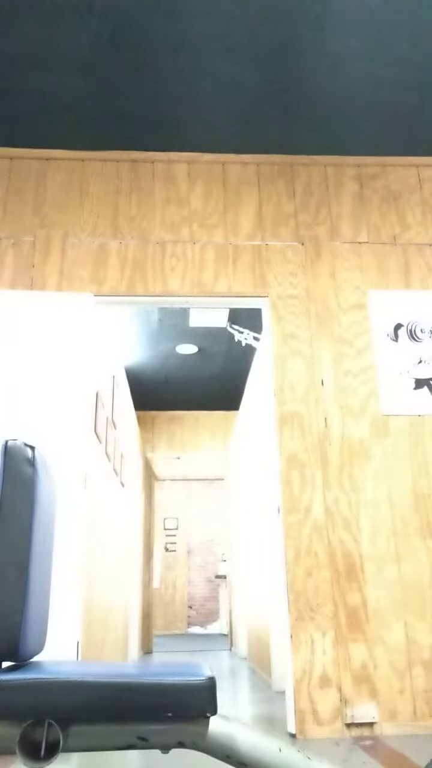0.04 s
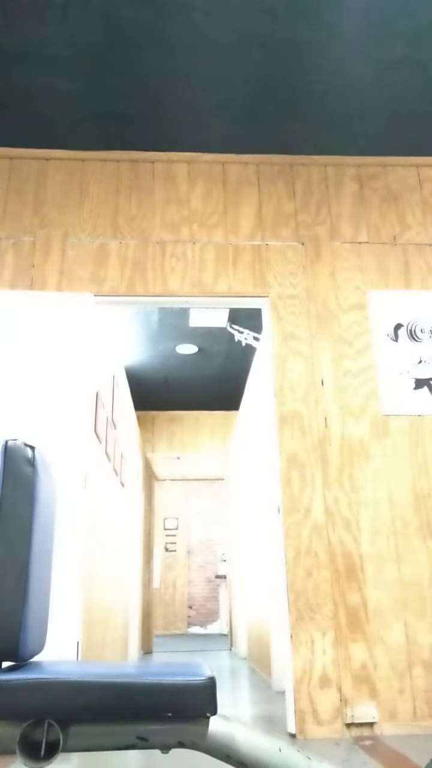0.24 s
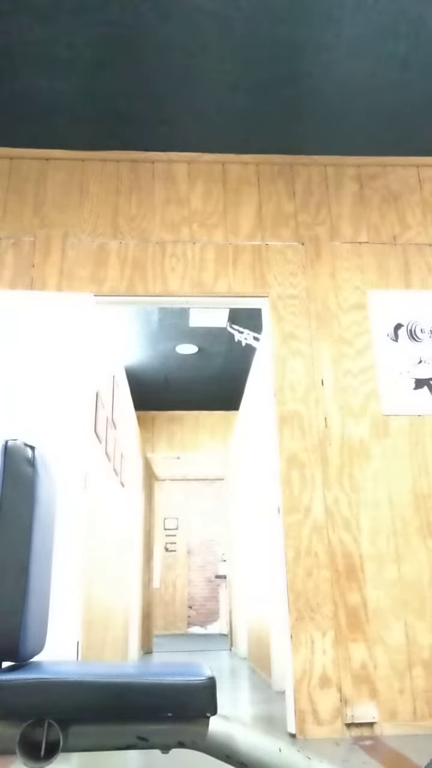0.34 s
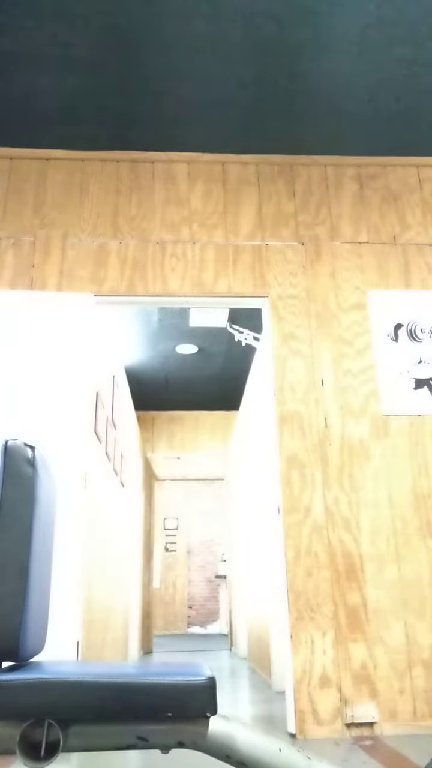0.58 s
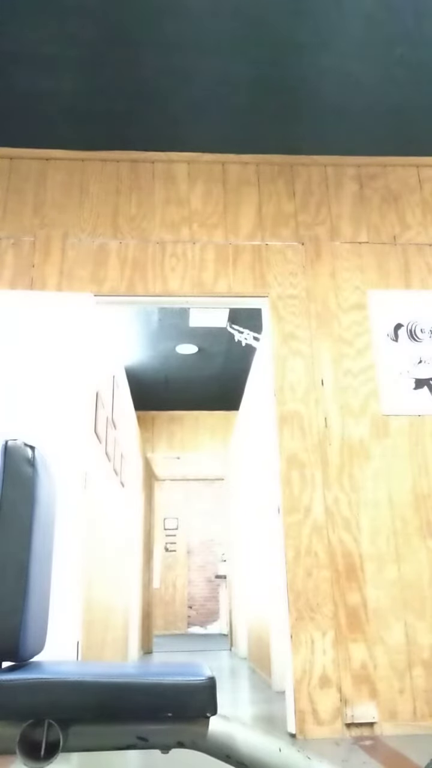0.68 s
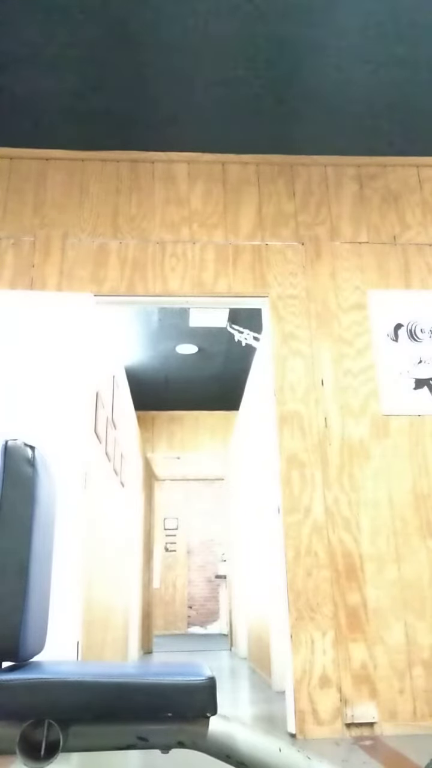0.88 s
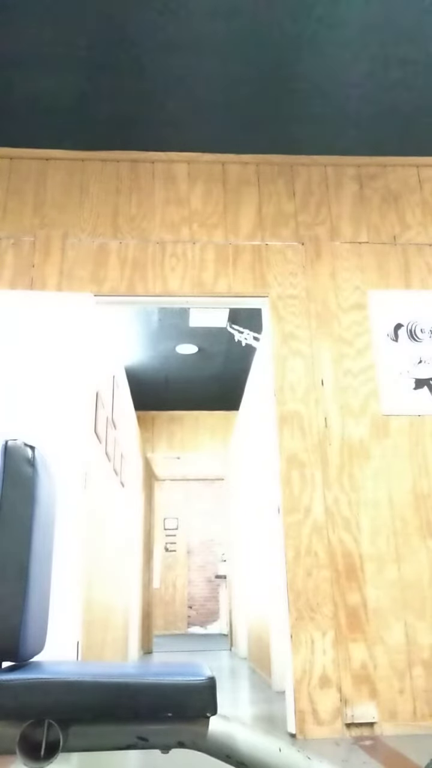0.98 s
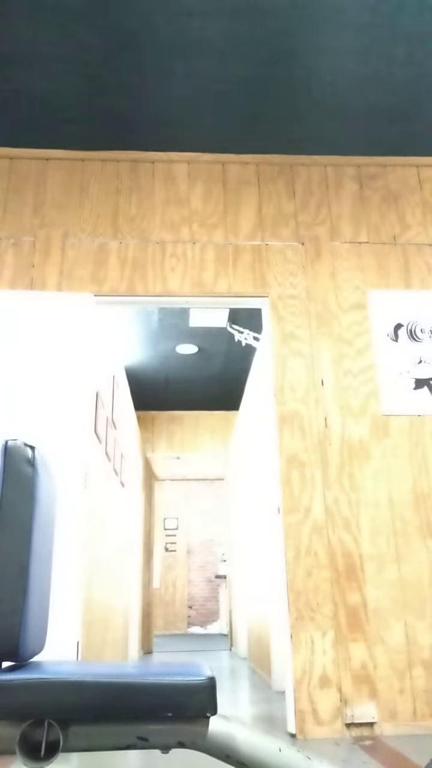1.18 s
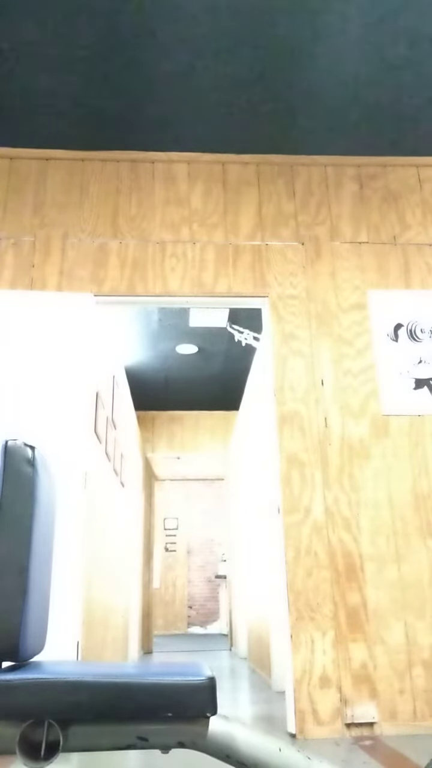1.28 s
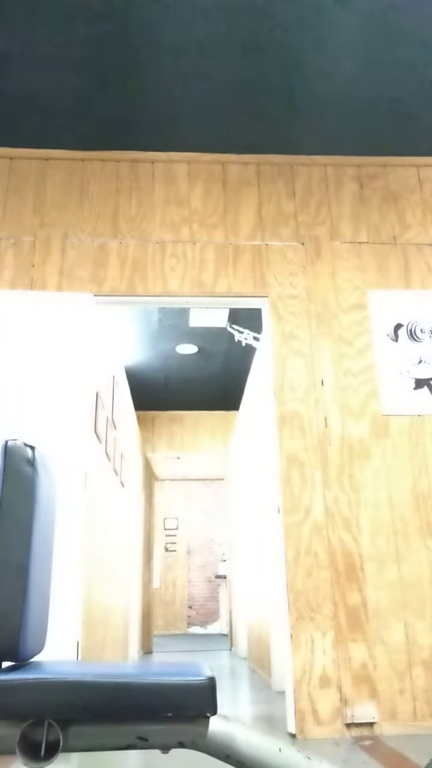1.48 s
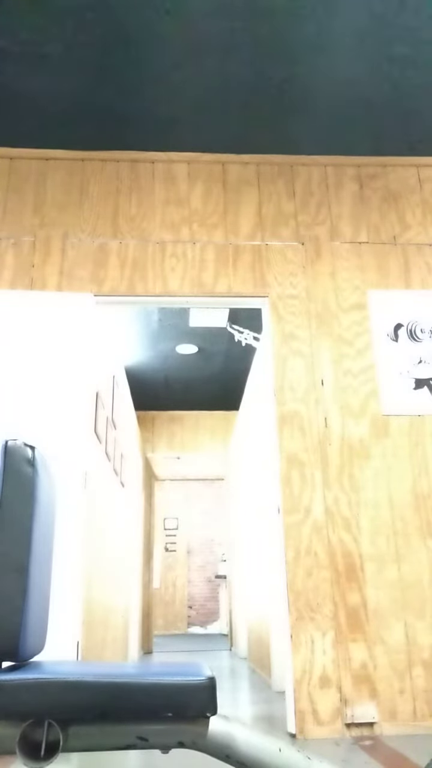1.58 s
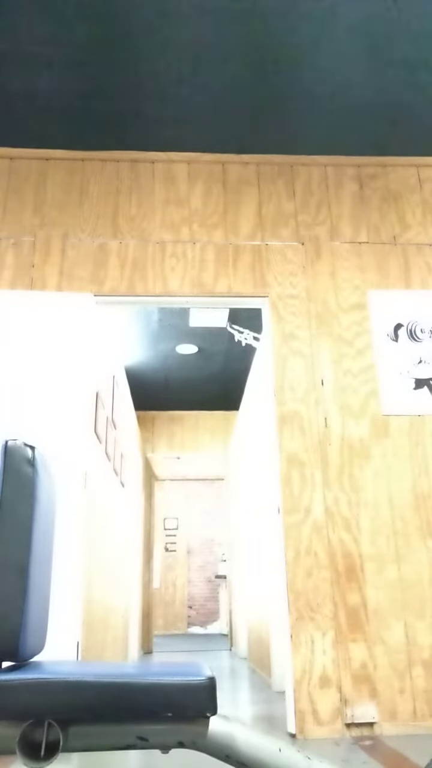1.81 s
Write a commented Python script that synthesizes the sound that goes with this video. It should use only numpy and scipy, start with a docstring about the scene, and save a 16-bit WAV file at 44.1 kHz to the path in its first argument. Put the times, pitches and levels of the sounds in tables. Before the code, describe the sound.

Gym weights land twice, a heavy thud then a bright iron clank, in an echoing room.

```python
"""Gym weights land twice, a few metres from the microphone in a hard-walled room.
First comes a heavy thud of the loaded frame on the floor, then a bright clank of iron plates.
Each landing is a quick run of contacts that rings the metal and fills the room.
Faint ventilation and a few soft rustles lie underneath."""
import sys
import numpy as np
from scipy import signal
from scipy.fft import rfft, irfft, next_fast_len
from scipy.io import wavfile

SR = 44100
rng = np.random.default_rng(int(sys.argv[2]) if len(sys.argv) > 2 else 0)


def put_to_file(sound):
    """Save the sound as 16-bit audio at rate SR, in the file named by the first command-line argument."""
    columns = np.atleast_2d(sound).T  # one column per channel
    safe = np.clip(columns, -1, 1)
    whole_steps = np.round(safe * 32767)
    wavfile.write(sys.argv[1], SR, whole_steps.astype(np.int16))


N = 81585
BUILD_S = 0.0034  # rise time of the ringing, in the metal and in the room


def undb(db):
    """Decibels to gain."""
    return 10 ** (np.asarray(db) / 20)


def along(points, hz):
    """Read (f/Hz, value) points on a log-frequency axis."""
    freqs, values = np.array(points, float).T
    return np.interp(np.log(np.maximum(hz, 1)), np.log(freqs), values)


def shape(x, gain):
    """Filter by a gain that is a function of frequency."""
    size = next_fast_len(len(x))
    hz = np.arange(size // 2 + 1) * SR / size
    return irfft(rfft(x, size) * gain(hz), size)[:len(x)]


def noise(colour):
    """Noise with rms 1 whose spectrum follows (f/Hz, level/dB) points."""
    x = shape(rng.standard_normal(N), lambda f: undb(along(colour, f)))
    return x / x.std()


def walk(rate_hz):
    """Slow random drift with spread 1."""
    x = shape(rng.standard_normal(N), lambda f: 1 / (1 + (f / rate_hz) ** 4))
    return x / x.std()


def add(out, start_s, x):
    """Mix a sound in from its start time."""
    i = int(np.clip(start_s * SR, 0, N - 1))
    out[i:] += x[:N - i]


def fade(t, t60):
    """Exponential decay, 60 dB down after t60 seconds."""
    return np.exp(-np.log(1000) * t / np.maximum(t60, 1e-3))


def rise(t, attack_s):
    """Smooth onset from 0 towards 1."""
    return 1 - np.exp(-t / attack_s)


def ventilation(t):
    """Room tone: a faint rush of air that wavers slightly and dips once, briefly."""
    # spectrum of the moving air: f/Hz, level/dB
    colour = [(25, -5.5), (60, -8), (130, 3.5), (190, -1), (260, 8), (350, -0.5), (600, -2.5),
              (1200, -13.5), (2200, -15.5), (3300, -24.5), (6500, -33), (8200, -34), (11000, -45.5),
              (16000, -58.5)]
    # the dip: t/s, half length/s, level/dB
    dip = (1.074, .014, -6)
    centre_s, half_s, depth_db = dip
    dip_db = depth_db * np.exp(-((t - centre_s) / half_s) ** 2)
    return noise(colour) * undb(-63.5 - 0.97 * walk(rate_hz=5) + dip_db)


def rustles(t):
    """Soft rustles in the gym, each starting quickly and trailing off."""
    # rustles: t/s, level/dB, decay time constant/s
    events = [(0.0, -68, 0.25), (0.035, -94, .06), (0.441, -56.5, 0.19), (0.53, -62.5, 0.19),
              (0.655, -64, 0.1), (0.82, -79, 0.072), (1.237, -70, .05)]
    # spectrum of a rustle: f/Hz, level/dB
    colour = [(100, -17), (600, 8), (2000, 0), (3300, -9), (6500, -19), (8200, -13.5), (11000, -24),
              (16000, -34)]
    out = np.zeros(N)
    for start, db, decay_s in events:
        add(out, start, undb(db) * noise(colour) * rise(t, attack_s=0.004) * np.exp(-t / decay_s))
    return out


def metal_ticks(t):
    """A light, bright tick as the parts first touch in each landing."""
    # first touches: t/s, level/dB
    touches = [(0.2099, -43.5), (1.4735, -49.5)]
    # spectrum of a tick: f/Hz, level/dB
    colour = [(200, -20.5), (1500, 8), (4000, -1.5), (6500, -8), (10000, -3.5), (13000, -8), (16000, -7.5)]
    out = np.zeros(N)
    for start, db in touches:
        add(out, start, undb(db) * noise(colour) * fade(t, t60=0.09))
    return out


def floor_thumps(t):
    """Short, deep knocks as the floor takes the weight of the first landing."""
    # knocks: t/s, level/dB
    knocks = [(0.2345, -26), (0.2535, -26.5)]
    # spectrum of the floor's response: f/Hz, level/dB
    colour = [(30, -53.5), (90, -32.5), (150, -5), (200, 1.5), (250, 1.5), (400, -15.5), (1000, -41.5),
              (4000, -86.5)]
    out = np.zeros(N)
    for start, db in knocks:
        add(out, start, undb(db) * noise(colour) * fade(t, t60=0.19) * rise(t, attack_s=0.0039) ** 2)
    return out


def room_tail(colour, t):
    """Dense ringing that builds up between the hard walls and dies sooner in the treble."""
    # reverberation time of the gym: f/Hz, t60/s
    room_t60 = [(80, 1), (200, 0.57), (500, .64), (1000, 0.53), (2000, 0.52), (4000, 0.39), (8000, 0.3),
                (11500, 0.28), (15000, .3)]
    wash, out = noise(colour), np.zeros(N)
    centres = [hz for hz, _ in room_t60]
    for (_, t60), share in zip(room_t60, np.eye(len(centres))):
        band = list(zip(centres, share))  # gain 1 at this centre, 0 at the others
        out += shape(wash, lambda f: along(band, f)) * fade(t, t60)
    return out * rise(t, BUILD_S)


def metal_spectrum(colour, clusters):
    """Broad colour, lifted at clusters of close modes and rippled by countless weaker ones."""
    ripple_db, ripple_spacing_hz = 3, 32.38
    hz = np.arange(20, SR / 2, 5.)
    steps = rng.standard_normal(4000)
    ripple = np.interp(hz / ripple_spacing_hz, np.arange(len(steps)), steps)
    db = along(colour, hz) + ripple_db * ripple * hz / (hz + 900)  # smoother in the bass
    for centre, width, lift_db in clusters:
        db += lift_db / (1 + (2 * (hz - centre) / width) ** 4)
    return np.column_stack([hz, db])


def metal_ring(modes, hits, t):
    """Each contact feeds energy to every mode; the room makes the tones beat."""
    beat_hz, scatter_db = 13, 5.7
    out = np.zeros(N)
    for hz, mode_db, t60 in modes:
        energy = np.zeros(N)
        swell = (fade(t, t60) * rise(t, BUILD_S)) ** 2
        for start, hit_db, cutoff_hz in hits:
            add(energy, start, swell * undb(hit_db + mode_db) ** 2 / (1 + (hz / cutoff_hz) ** 4))
        phase = 2 * np.pi * (hz * t + rng.random()) + 0.48 * walk(beat_hz)
        beating = undb(scatter_db * walk(beat_hz))
        out += np.sqrt(energy) * beating * np.sin(phase)
    return out


def contacts(hits, spectrum, t, crack_db, tail_db):
    """A run of contacts, each a short crack with a room tail; each contact has its own brightness."""
    out = np.zeros(N)
    for start, db, cutoff_hz in hits:
        crack = undb(crack_db) * noise(spectrum) * fade(t, t60=0.04)
        tail = undb(tail_db) * room_tail(spectrum, t)
        lowpass = signal.butter(2, cutoff_hz, fs=SR, output="sos")
        add(out, start, undb(db) * signal.sosfilt(lowpass, crack + tail))
    return out


def frame_thud(t):
    """First landing: the loaded frame comes down heavily and rings low."""
    # contacts of the frame: t/s, level/dB, treble cutoff/Hz
    hits = [(0.2075, -18.5, 2220), (0.2165, -5.5, 1700), (0.2238, 1.5, 8000), (0.2325, -0.5, 2980),
            (0.2415, 2.5, 3200), (0.2545, 2, 9000), (0.2695, -5, 8000), (0.298, -3.5, 6500),
            (0.327, -8.5, 5830), (0.3645, -24.5, 4440)]
    # dense ringing between the modes: f/Hz, level/dB
    colour = [(30, -37), (65, -27.5), (110, -17), (190, -5.5), (330, -5.5), (700, -5.5), (1000, -7.5),
              (1350, -9.5), (1900, -4.5), (2900, -15), (4300, -14.5), (6700, -23.5), (8400, -15.5),
              (10500, -24), (16000, -26)]
    # clusters of close modes: f/Hz, width/Hz, lift/dB
    clusters = [(208, 34, 6), (1270, 190, 6), (2504, 31, 3.5), (3360, 94, 2.5), (4400, 660, 2),
                (5950, 300, 6), (7700, 290, 5)]
    # modes of the loaded frame: f/Hz, level/dB, t60/s
    modes = [(170, -4, .45), (192, 0, .35), (229, 2, .42), (317, 2, .48), (357, 1, .52), (391, -2, .48),
             (484, -2, .52), (684, -2, .42), (883, -2, .48), (1323, 1, .36), (1717, -7, .5),
             (1787, -4, .45), (2051, -7, .42), (2907, -10, .28)]
    blows = contacts(hits, metal_spectrum(colour, clusters), t, crack_db=-25, tail_db=-28.5)
    return blows + undb(-45) * metal_ring(modes, hits, t)


def plate_clank(t):
    """Second landing: the iron plates clatter and ring brightly."""
    # contacts of the plates: t/s, level/dB, treble cutoff/Hz
    hits = [(1.4743, -11.5, 2500), (1.4823, 0.5, 1080), (1.4893, 3, 4100), (1.4965, 1.5, 14100),
            (1.510, -1.5, 14100), (1.532, 2, 7600), (1.555, -2.5, 7000), (1.580, -5, 7850),
            (1.602, -8.5, 6500), (1.622, -25, 2380), (1.672, -7, 860)]
    # dense ringing between the modes: f/Hz, level/dB
    colour = [(30, -31), (75, -35), (150, -7.5), (450, -7), (650, -7), (950, -3.5), (1550, -9),
              (2000, -8.5), (2600, -12.5), (3850, -16.5), (4600, -16.5), (5900, -15), (6900, -19),
              (8500, -10), (10800, -25), (16000, -32.5)]
    # clusters of close modes: f/Hz, width/Hz, lift/dB
    clusters = [(650, 100, 3), (1050, 220, 2), (2100, 140, 3), (3040, 80, 6), (3560, 70, 7),
                (4265, 200, 12), (7630, 150, 7), (8070, 160, 8)]
    # modes of the iron plates: f/Hz, level/dB, t60/s
    modes = [(608, -1, .52), (668, -2, .46), (879, -3, .5), (916, -2, .52), (1005, -3, .52), (1096, -3, .5),
             (1694, -5, .42), (2805, -8, .25), (3548, -5, .3), (4199, -2, .36), (4237, -5, .36),
             (4290, -3, .36), (5195, -10, .38), (7600, -8, .28), (8030, -2, .3)]
    blows = contacts(hits, metal_spectrum(colour, clusters), t, crack_db=-29, tail_db=-29)
    return blows + undb(-45.5) * metal_ring(modes, hits, t)


def scene():
    """Both landings from a few metres away, over the quiet of the gym, in mono."""
    t = np.arange(N) / SR
    weights = frame_thud(t) + plate_clank(t) + floor_thumps(t) + metal_ticks(t)
    return (weights + ventilation(t) + rustles(t))[None]


def record(dry):
    """The phone's microphone thins the deep bass; the phone holds down the peaks and cuts the top."""
    low_hz, top_hz = 74, 16000
    threshold_db, ratio, window_s = -24, 2, 0.012
    thin = signal.sosfilt(signal.butter(2, low_hz, "high", fs=SR, output="sos"), dry)
    pole = np.exp(-1 / (window_s * SR))
    rms = np.sqrt(signal.lfilter([1 - pole], [1, -pole], thin ** 2))
    held = thin * np.maximum(rms / undb(threshold_db), 1) ** (1 / ratio - 1)
    return signal.sosfilt(signal.ellip(10, .2, 70, top_hz, fs=SR, output="sos"), held)


dry = scene()
out = record(dry)
put_to_file(out)
```